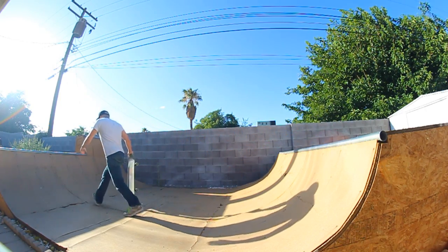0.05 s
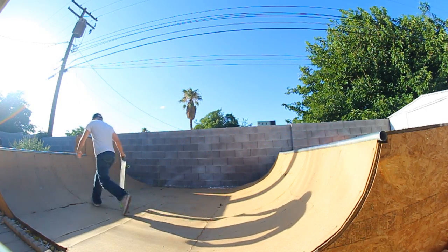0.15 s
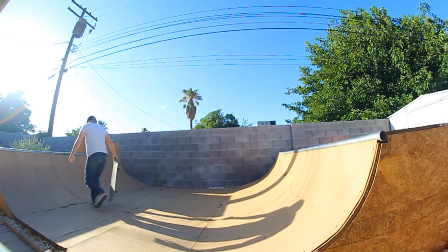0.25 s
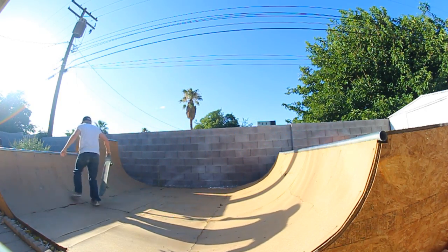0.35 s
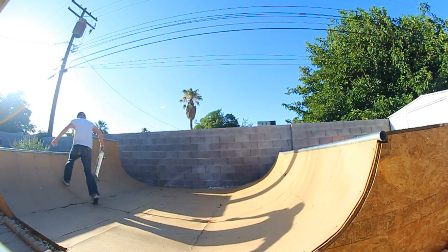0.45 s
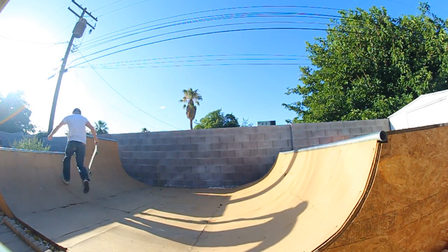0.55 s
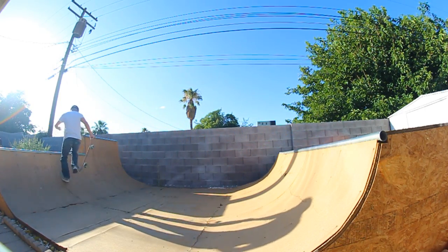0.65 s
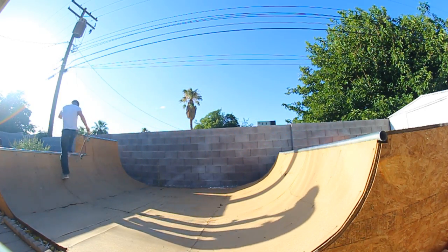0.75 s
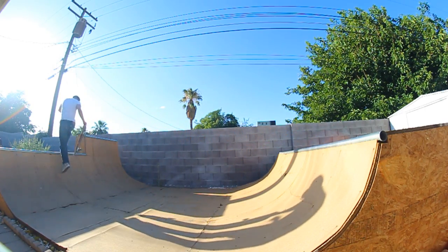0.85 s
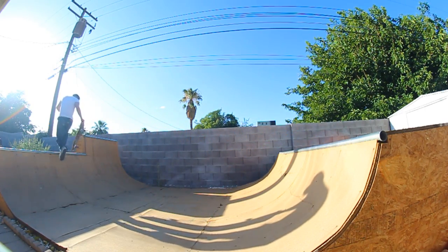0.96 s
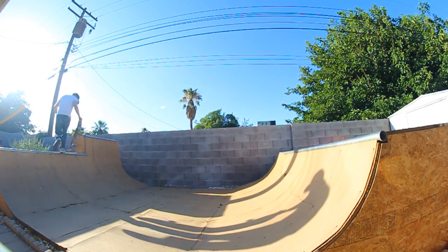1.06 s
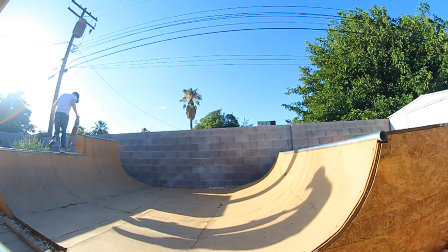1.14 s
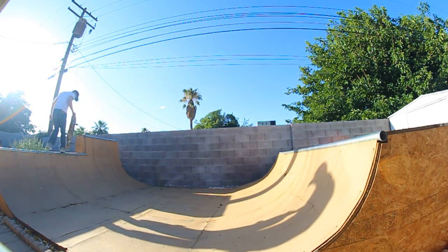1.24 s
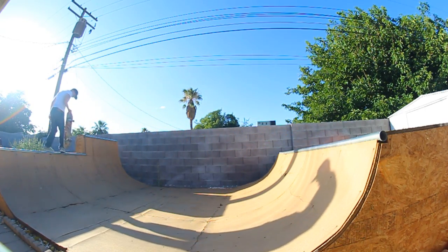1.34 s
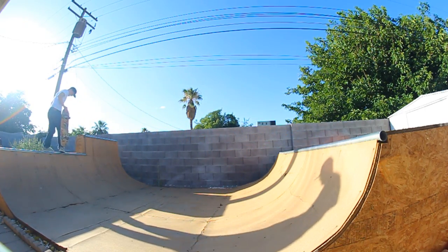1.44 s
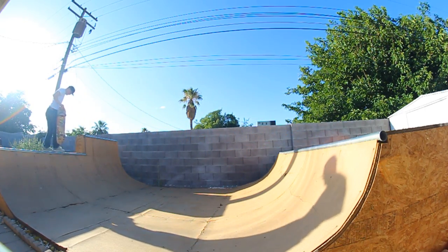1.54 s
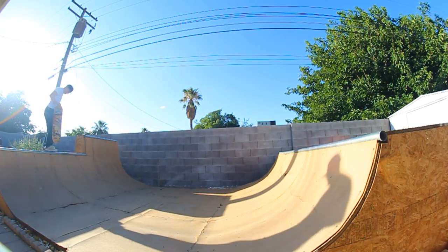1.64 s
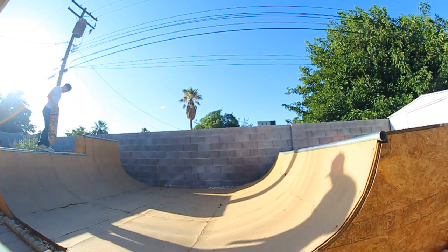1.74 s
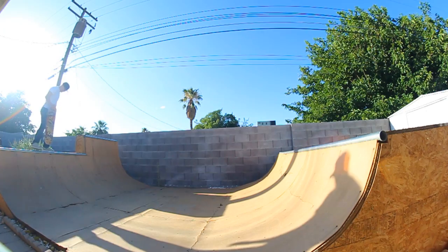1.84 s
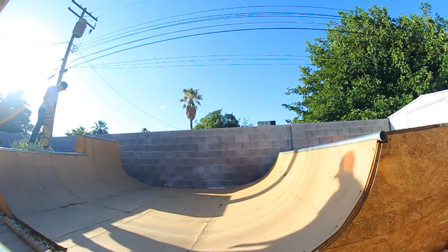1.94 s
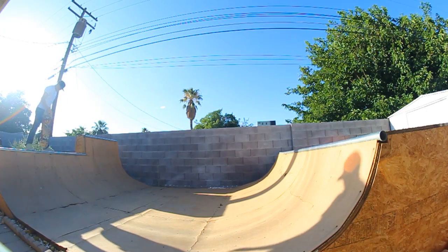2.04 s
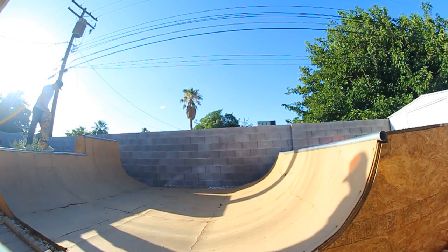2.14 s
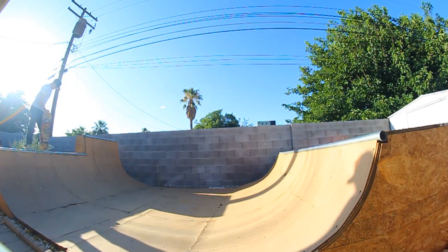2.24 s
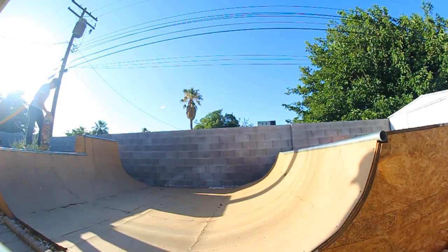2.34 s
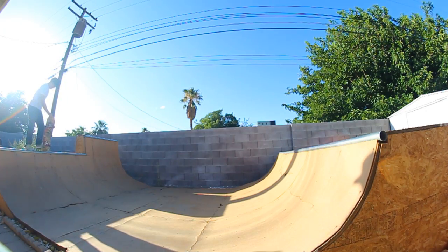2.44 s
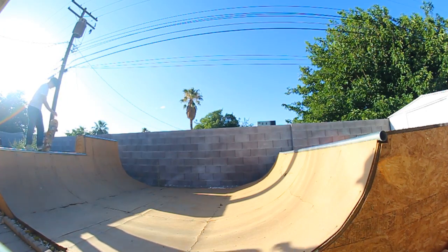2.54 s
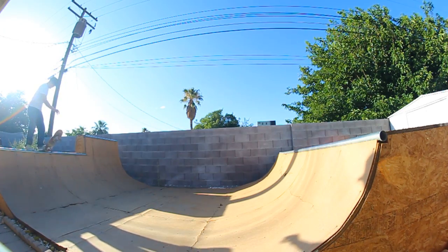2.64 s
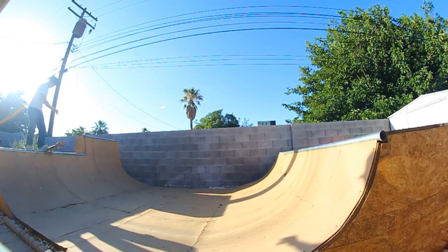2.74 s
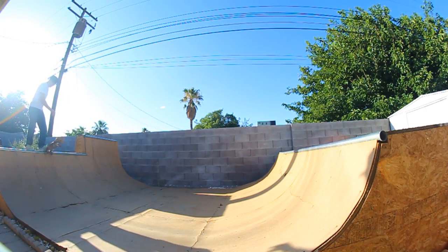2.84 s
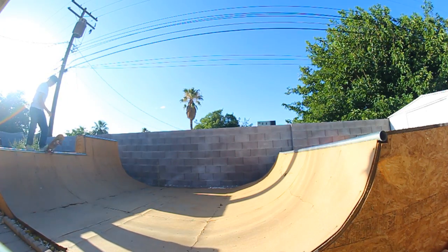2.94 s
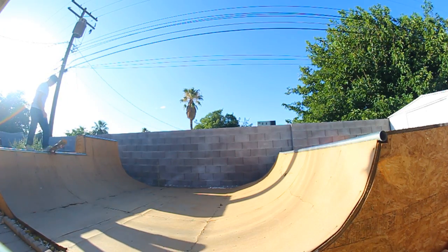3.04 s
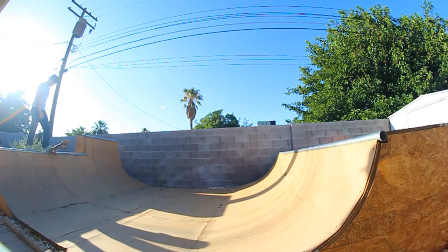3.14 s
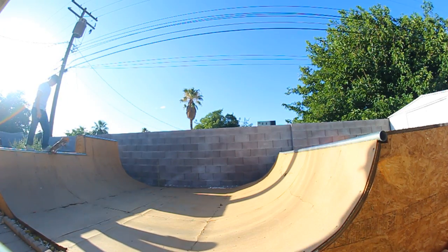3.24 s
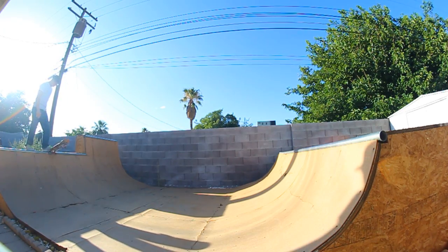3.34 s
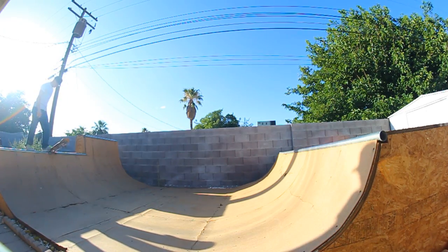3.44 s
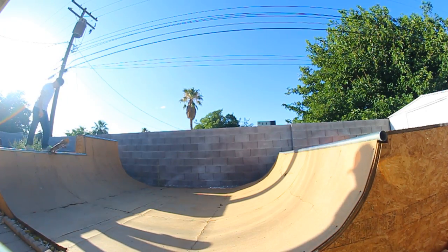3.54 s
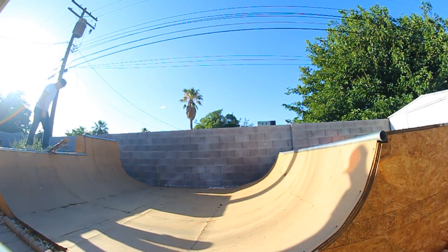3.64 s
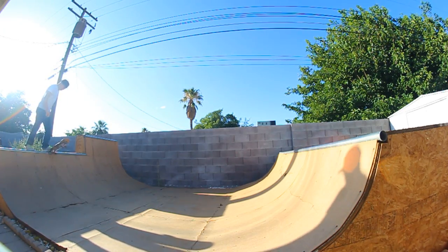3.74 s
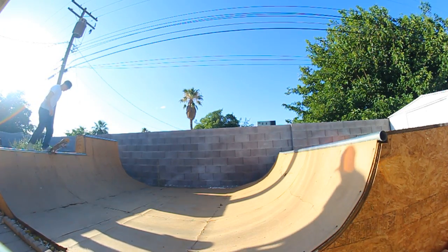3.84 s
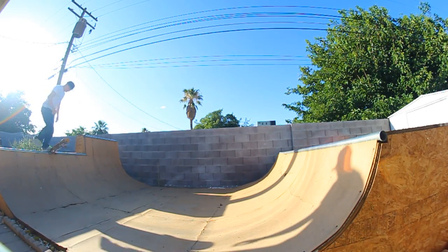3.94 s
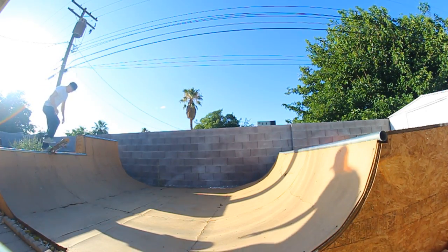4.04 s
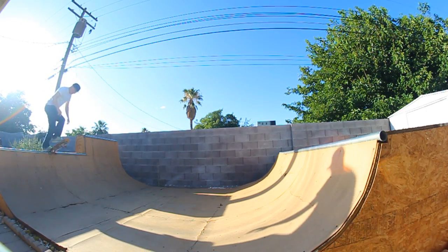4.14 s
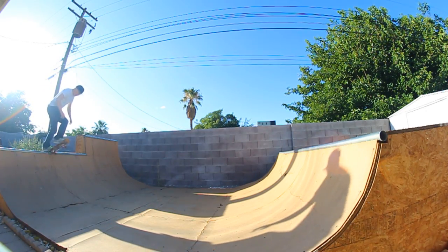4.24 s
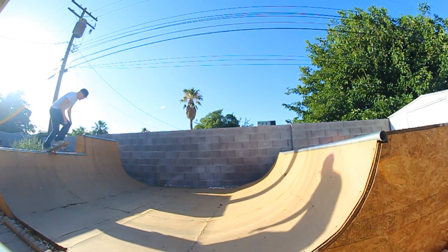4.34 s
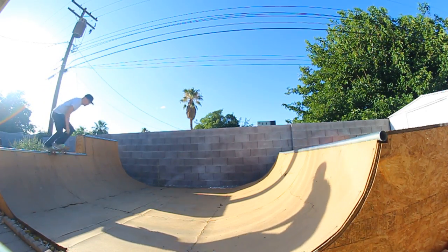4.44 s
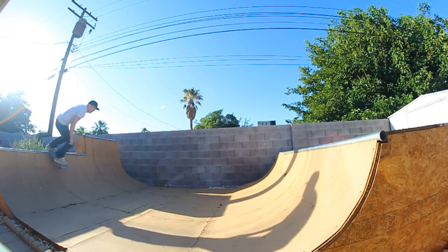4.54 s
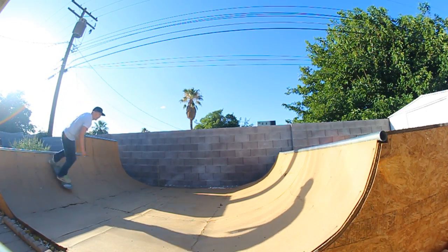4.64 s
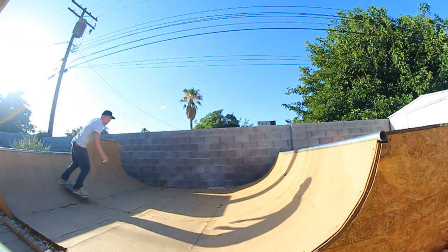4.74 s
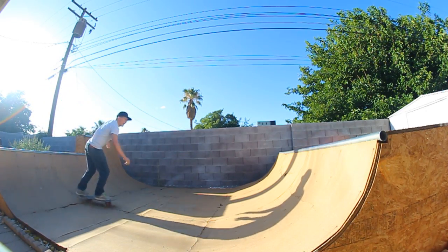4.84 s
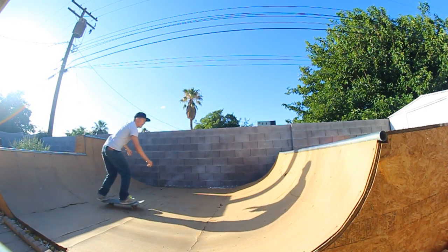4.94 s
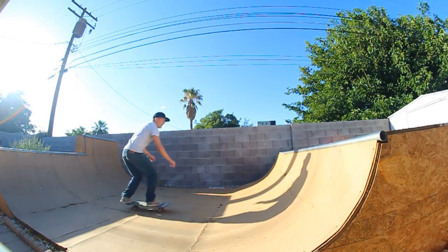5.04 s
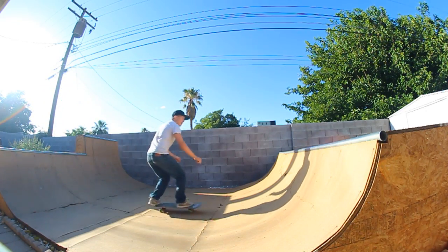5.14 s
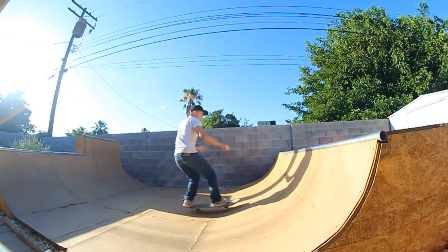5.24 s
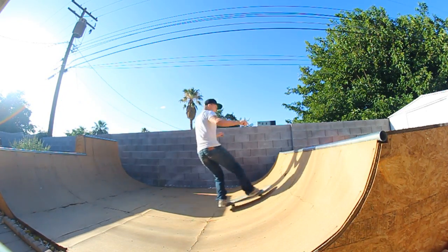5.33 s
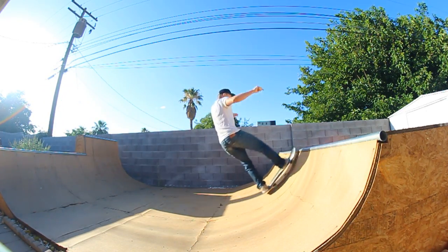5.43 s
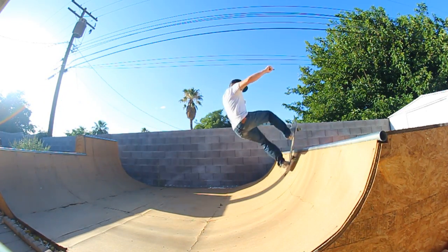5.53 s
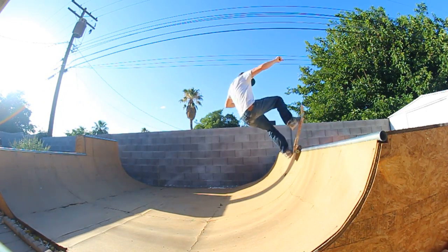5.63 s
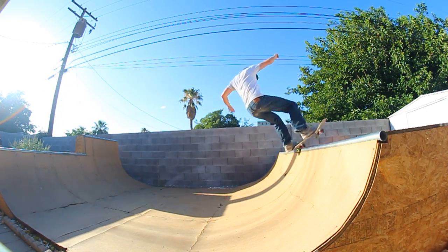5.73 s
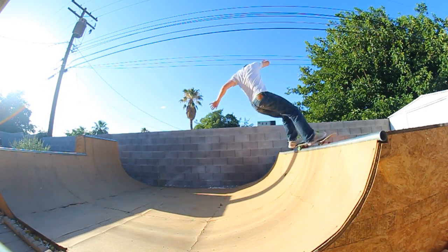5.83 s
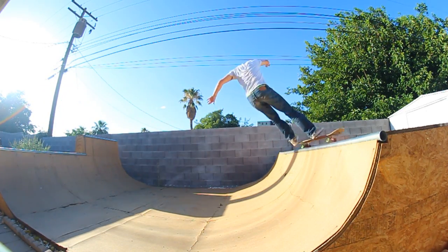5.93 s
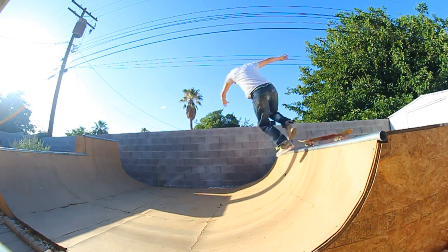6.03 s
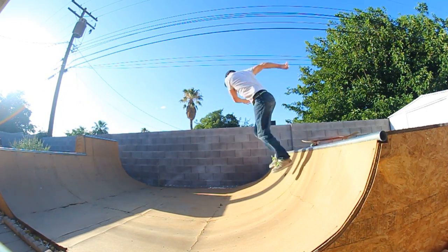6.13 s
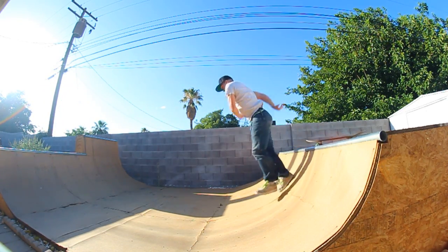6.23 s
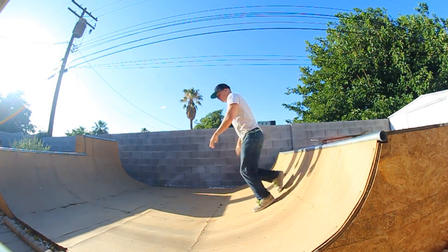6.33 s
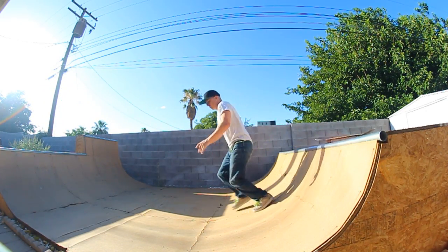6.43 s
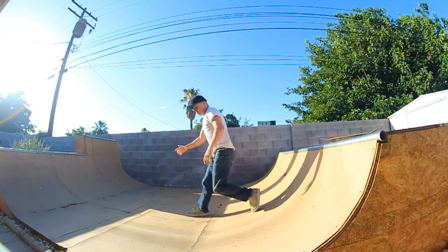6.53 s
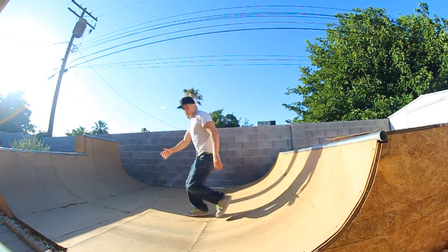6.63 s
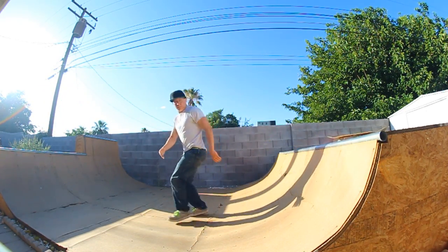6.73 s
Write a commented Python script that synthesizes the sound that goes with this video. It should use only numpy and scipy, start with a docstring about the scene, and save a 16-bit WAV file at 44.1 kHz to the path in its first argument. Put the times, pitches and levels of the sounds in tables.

```python
"""Outdoors on a hollow plywood ramp, near block walls, with a machine and traffic humming far off.
A skater walks up, sets the board on the steel edge, drops in, rolls over the sheet seams, hits the far
edge and runs out. Blows are noise bursts plus ringing modes; rolling and dragging are shaped noise;
rubber squeaks are gliding tones. The walls answer the blows and squeaks with a scattered tail.
A small microphone lifts near sounds around its port's resonance and clips on the loudest blows."""
import sys
import numpy as np
from scipy import signal
from scipy.fft import rfft, irfft, next_fast_len
from scipy.io import wavfile
from scipy.ndimage import map_coordinates

SR = 44100
rng = np.random.default_rng(int(sys.argv[2]) if len(sys.argv) > 2 else 0)


def waveform_to_disk(signal):
    """Save audio, clipped to [-1, 1], as 16-bit WAV at the path in sys.argv[1]."""
    frames = np.transpose(np.atleast_2d(signal))
    scaled = np.clip(frames, -1, 1) * 32767
    samples = np.round(scaled).astype(np.int16)
    wavfile.write(sys.argv[1], SR, samples)


N = 298998

# Table levels are relative: each source sets its own gain on top.
# Far traffic and hiss, spectral density [f/Hz, level/dB]
AIR_SPECTRUM = [(24, -35), (40, -2.5), (106, 0), (185, -6), (237, -5.5), (329, -8), (1210, -19),
                (1340, -20.5), (2000, -26), (2910, -30), (14800, -33.5), (16000, -32)]
# Far machine, steady tones [f/Hz, level/dB]
HUM_TONES = [(236.9, -54), (532.9, -65), (1120, -77), (1357, -68), (1475, -75), (2299, -74), (2945, -74.5)]
# Wind on the microphone [t/s, level/dB, length/s]
WIND_PUFFS = [(1.257, -37, .07), (1.62, -45, .14), (1.74, -39, 0.089), (1.965, -40, .12), (2.15, -47, 0.28),
              (3.098, -40, 0.8), (6.0, -36, 0.31)]
# Thuds and wind, spectral density [f/Hz, level/dB]
DEEP_SPECTRUM = [(10, 9.5), (25, -19), (42, 17), (70, 3.5), (200, -62)]
# Decay of the block walls' answer [f/Hz, T60/s]
YARD_DECAY = [(150, 0.83), (1000, 0.38), (4000, 0.39), (10000, 0.21)]

# Modes of the hollow ramp (boom), plywood and board (knock), maple board [f/Hz, level/dB, T60/s]
PANEL_MODES = [(61, -22, 0.96), (76.5, 0.5, 0.29), (113.3, 0.5, 0.25), (151.5, -4, 0.14),
               (176.1, -0.5, 0.13), (211.2, -6, 0.063)]
SHEET_MODES = [(263.2, 0, 0.062), (330.7, 2, 0.04), (422, 1.5, 0.039), (520, 0, 0.021), (646, -0.5, 0.037),
               (748, -5.5, 0.027)]
DECK_MODES = [(886, -1.5, 0.063), (1224, 7.5, 0.036), (1430, 0, 0.014), (1960, -2.5, 0.11),
              (2230, -8, 0.079)]
# Noise of hard parts in low, middle and high treble, and of grit: spectral density [f/Hz, level/dB]
CLACK_SPECTRUM = [(400, -2.5), (800, 3.5), (1300, -1), (2000, -5.5), (3000, -28.5), (6000, -41)]
BITE_SPECTRUM = [(1500, -7), (2500, 0), (4500, -11.5), (6000, -18), (10000, -37)]
TOP_SPECTRUM = [(3500, 0), (6000, 0.5), (9000, -5.5), (16000, -16)]
GRIT_SPECTRUM = [(1500, 0.5), (2500, 4), (4500, -4.5), (6000, -9), (10000, -14.5), (16000, -22)]

# Wheels on the ramp [t/s, boom level/dB, drumming level/dB, clatter level/dB, grit level/dB]
WHEEL_LEVELS = [(4.752, -11, -3.5, -50, -54), (4.796, -6.5, -7, -48, -52), (4.838, -20, -15.5, -23, -38),
                (4.896, -12, -17, -30.5, -36.5), (4.99, -1, -15.5, -32, -36),
                (5.044, -19, -20.5, -31, -37.5), (5.07, -5, -27, -32, -36.5),
                (5.226, -33, -16.5, -46, -44.5), (5.36, -12.5, -21.5, -26, -35),
                (5.45, -15, -13, -30, -33.5), (5.626, -0.5, -2.5, -21, -28), (5.67, -17, -18.5, -19.5, -39),
                (5.77, -15.5, -17, -24.5, -41), (5.9, -44, -42, -39, -46)]
# Clatter of feet and board, and a faint hiss throughout [t/s, clatter level/dB, hiss level/dB]
CLATTER_AND_HISS_LEVELS = [(0.0, -56, -54.5), (0.6, -61, -54), (1.07, -56.5, -56), (1.4, -59.5, -57.5),
                           (2.5, -60.5, -59), (2.75, -49, -54), (2.86, -30, -44), (3.0, -49, -52.5),
                           (3.13, -38.5, -45.5), (3.33, -47.5, -61.5), (3.65, -64, -58), (4.3, -63, -62),
                           (4.7, -49, -51), (5.9, -40, -39), (5.95, -21.5, -40.5), (6.12, -45.5, -48.5),
                           (6.3, -32.5, -42), (6.42, -26.5, -53), (6.52, -33.5, -42), (6.64, -61, -52),
                           (6.78, -61, -57)]
# Soles and board dragging on the sheet or the edge [start t/s, middle of the fade-out t/s, level/dB,
# centre f/Hz, width/octaves]
DRAGS = [(0.22, 0.292, -59, 4550, 0.86), (1.468, 1.567, -45, 470, 0.99), (3.17, 3.33, -42.5, 460, 1.5),
         (3.103, 3.1, -44, 3600, 0.25), (3.166, 3.305, -55.5, 3000, 1.45), (5.359, 5.3, -34, 3900, 1.9),
         (5.42, 5.4, -36.5, 4500, .9), (2.781, 2.93, -46, 1790, 2), (2.875, 2.98, -45.5, 2000, 0.55),
         (5.926, 6.046, -48, 5060, 1.4), (5.76, 5.824, -32, 3400, 1.03), (5.805, 5.8, -34, 2700, 0.44),
         (6.384, 6.435, -37, 3460, 0.32), (6.463, 6.527, -42, 3600, 0.51), (6.655, 6.673, -31, 4900, 0.86)]
# Rubber soles slipping on the sheet [t/s, f/Hz, level/dB, length/s, octave level/dB over the tone]
SOLE_SQUEAKS = [(0.633, 1810, -25, 0.0051, -20), (0.645, 1950, -17.5, 0.0049, -20),
                (0.666, 2080, -39, 0.032, -10), (0.692, 1990, -39.5, 0.022, -19),
                (0.737, 2010, -63, 0.061, -16), (1.092, 4440, -52, 0.013, -30),
                (1.11, 4400, -56, .012, -30), (1.13, 4400, -60, .012, -30), (6.67, 2186, -14, 0.0072, -5),
                (6.735, 2230, -41, 0.026, -19), (6.762, 2300, -54, 0.024, -22)]

# Footfalls, board striking the ramp or its steel edge, axles crossing a seam between sheets
# [t/s, crack level/dB in low, middle and high treble, knock level/dB, boom level/dB,
# rattle level/dB over the crack]
FOOTFALLS = [(0.2108, -62, -65, -64, -33, -25.5, -1), (0.622, -34, -44, -58, -31, -24, 0),
             (0.6335, -37.5, -42, -47.5, -21.5, -31, 1), (1.032, -50, -64, -68, -27, -23, 5),
             (1.085, -58, -68, -70, -30, -23, 8), (1.466, -54, -72, -72, -25.5, -29, 8),
             (2.1496, -72, -71, -72, -35.5, -31, -5), (2.5454, -42.5, -64, -70, -24.5, -19.5, -0.5),
             (2.6124, -49, -56, -66, -28, -25, 0), (3.19, -44, -48, -66, -23.5, -20, 5),
             (3.605, -51, -58, -55, -43, -41, 2), (3.674, -52.5, -63, -70, -37, -36, 5.5),
             (4.376, -56, -67, -77, -36, -48, 9.5), (4.4089, -47, -57, -60, -35, -23.5, 1.5),
             (4.5954, -56, -70, -55.5, -39, -33.5, 2), (6.0855, -27, -48, -46, -7, -16, -0.5),
             (6.2291, -14, -47, -37, -2.5, -0.5, 0), (6.2359, -20, -39, -47, 1, -17, 0.5),
             (6.4395, -9.5, -11.5, -25.5, 1, 4.5, -20), (6.6502, -33, -40, -40, -18.5, -21, 2.5),
             (6.6769, -15.5, -16.5, -28, -3.5, 6, -16)]
BOARD_STRIKES = [(0.58, -69, -47, -47, -52, -55, -10), (2.7122, -48, -55, -56, -36, -39, 3),
                 (2.778, -21, -36.5, -48, -11.5, -24, 1), (2.7868, -33, -40, -41, -7, -10, -3),
                 (2.8673, -15, -21, -49, -9, -11.5, -6.5), (2.985, -50, -58, -66, -36, -28.5, 0),
                 (3.0639, -58, -50, -63, -46, -36, -11), (3.1508, -26.5, -28, -60, -41, -44, -12),
                 (3.1624, -43, -43, -48, -26, -22, 2), (4.6663, -53, -54, -67, -49, -35, -12),
                 (4.746, -3.5, -14, -29, -1, -0.5, -9.5), (4.7603, -21.5, -31, -40, 7, 1, 10),
                 (4.788, -14.5, -26.5, -49, -16, -2, 2), (5.552, -13, -21, -28.5, 2, 2, -14),
                 (5.6031, -14, -24.5, -28, 11, 4, 6), (5.6237, -23, -31, -47, -9, 2, 0),
                 (5.7031, -21, -34.5, -33, -2, -2.5, 1), (5.7661, -19, -29.5, -31, -11, -4.5, 6),
                 (5.917, -13, -30, -32.5, -1, -1.5, -2.5), (5.948, -22, -42, -44, 2, -3, -7),
                 (6.1657, -33.5, -57, -48, -24, -20, -5), (6.2024, -27.5, -41, -40, -4, -16, -6),
                 (6.348, -14.5, -21.5, -34, -8, -10, -26), (6.355, -27, -25, -46, 1, -22, -10),
                 (6.367, -8, -11.5, -16.5, 0, 0.5, -17), (6.383, -26, -32, -57, -1.5, -2.5, -19)]
SEAM_CROSSINGS = [(4.918, -29.5, -41, -50, -5, 2, 3), (4.9996, -28.5, -40, -45, -28, -1.5, 0),
                  (5.1056, -18.5, -24.5, -53, -1, -2.5, -1), (5.162, -16, -21, -54, 0, -12, -8),
                  (5.2016, -15, -21.5, -48, -0.5, -5.5, -4.5), (5.254, -16.5, -24.5, -41, 1.5, -0.5, -4),
                  (5.3681, -17, -20.5, -30, -1.5, 0.5, -25), (5.4409, -11, -19, -27, 7.5, -2, -16),
                  (5.4767, -32, -47, -56, 1.5, -2.5, 7)]
# The axle's second wheel meets the seam later and softer [delay/s], [level change/dB, column by column]
OTHER_WHEEL_S, OTHER_WHEEL_DB = 0.011, (-17, -7, -2, -7.5, -12.5, -8)
# What each kind favours [knock f/Hz, shudder level/dB over the blow, softness/times the attack]
STEP_KIND, STRIKE_KIND, SEAM_KIND = (300, -15.5, 1.57), (279, -14.5, 1.17), (435, -36, 1.19)
# Boom pitch favoured by the part of the ramp under the skater [t/s, f/Hz]
PLACE_PITCH = [(0.2, 83), (1.1, 84.5), (2.6, 120), (2.8, 140), (3.2, 79.5), (4.75, 118), (5.0, 75),
               (5.3, 180), (5.6, 116), (5.9, 84), (6.2, 173), (6.37, 91), (6.44, 200), (6.68, 150)]
# The ramp shuddering on: rows for boom, drumming and deep thud [level/dB, swell/s before softness, T60/s]
AFTER_SHUDDER = [(-1, 0.01, 0.41), (-5.5, 0.0084, 0.24), (-15, .03, 0.5)]

SHUDDER_GROWS = 0.77  # dB of shudder per dB of blow: hard blows ring more than they shudder
SOFT_DAMPS_DB_PER_S = 450  # a soft blow stays on and damps the boom, per unit of softness over 1
AIR_DB = -50
BAND_LIMIT_HZ = 16000


def amp(db):
    """Decibels to amplitude."""
    return 10 ** (np.asarray(db) / 20)


def unit(x):
    """Scale to rms 1."""
    return x / np.sqrt(np.mean(x ** 2) + 1e-20)


def along(points, hz):
    """Values at hz from (frequency, value) points on a log axis."""
    f, v = np.transpose(points)
    return np.interp(np.log(hz + 1), np.log(f + 1), v)


def curves(rows):
    """One gain per sample for each level column, fading to silence just outside the table."""
    s, *columns = np.transpose(rows)
    s = np.r_[s[0] - 0.004, s, s[-1] + 0.02]
    t = np.arange(N) / SR
    return [amp(np.interp(t, s, np.r_[-100, column, -100])) for column in columns]


def wobble(rate):
    """A smooth random curve, rate knots a second."""
    knots = rng.standard_normal(int(N * rate / SR) + 4)
    return map_coordinates(knots, [np.arange(N) * rate / SR])


def filtered(x, response):
    """x times a complex response of frequency."""
    m = next_fast_len(N + SR // 2)
    return irfft(rfft(x, m) * response(np.fft.rfftfreq(m, 1 / SR)), m)[:N]


def noise(spectrum):
    """Coloured noise of rms 1."""
    return unit(filtered(rng.standard_normal(N), lambda hz: amp(along(spectrum, hz))))


def resonant(modes, low_hz, top_hz):
    """Noise of rms 1 through a body's modes; little is driven outside low_hz to top_hz."""
    def body(f):
        peaks = 0
        for k, (centre, db, t60) in enumerate(modes):
            damping = 1j * f * 2.2 / t60  # a short decay makes a wide peak
            peaks = peaks + (-1) ** k * amp(db) * damping / (centre ** 2 - f * f + damping)
        drive = (1j * f / (low_hz + 1j * f) / (1 + 1j * f / top_hz)) ** 2
        return peaks * drive
    return unit(filtered(rng.standard_normal(N), body))


def ring(modes, t, spot_hz, attack, spread, focus_db):
    """One blow on a body, peak 1: modes lose focus_db per octave from spot_hz and vary at random."""
    hz, db, t60 = np.transpose(modes)[:, :, None]
    level_draw, pitch_draw, phase_draw = rng.standard_normal((3, len(modes), 1))
    level = db - focus_db * np.abs(np.log2(hz / spot_hz)) + 2.4 * level_draw
    phase = 2 * np.pi * (hz * (1 + spread * pitch_draw) * t + 0.08 * phase_draw)
    x = np.sum(amp(level - 60 * t / t60) * np.sin(phase), axis=0)
    x = x * (1 - np.exp(-t / attack))
    return x / np.max(np.abs(x))


def background():
    """Far off: traffic and hiss as swelling noise, a machine as wavering tones; wind as deep noise puffs."""
    t = np.arange(N) / SR
    air = amp(AIR_DB) * amp(0.9 * wobble(4.3)) * noise(AIR_SPECTRUM)
    hum = np.zeros(N)
    for hz, db in HUM_TONES:
        level = amp(db + 3.5 + 1.8 * wobble(9))
        hum += level * np.sin(2 * np.pi * (hz * t + 0.016 * wobble(3.2)))
    gusts = sum(amp(db) * np.exp(-(2 * (t - s) / length) ** 2) for s, db, length in WIND_PUFFS)
    return air + hum + amp(-3.5) * gusts * noise(DEEP_SPECTRUM)


def yard(x):
    """The walls' answer: each frequency dies at its own speed; new scatter every third of a second."""
    out, step = np.zeros(N + SR), SR // 3
    delay = 400  # samples, about 9 ms
    for start in range(0, N, step):
        hz, t, z = signal.stft(rng.standard_normal(SR // 2), SR, nperseg=256)
        decay = amp(-60 * t / along(YARD_DECAY, hz)[:, None])
        tail = signal.istft(z * decay, SR, nperseg=256)[1]
        wet = signal.fftconvolve(x[start:start + step], tail / np.linalg.norm(tail))
        out[start + delay:][:len(wet)] += wet
    return out[:N]


def scrapes():
    """Dragging: grainy noise around a centre pitch, with soft ends."""
    out, t = np.zeros(N + SR), np.arange(SR // 4) / SR
    f = np.fft.rfftfreq(len(t), 1 / SR)
    grain = amp(2.5 * wobble(500) + 1.5 * wobble(60))
    for start, end, db, hz, octaves in DRAGS:
        fade_in, fade_out = t / 0.011, (end - start - t) / 0.04 + 0.5
        stroke = np.clip(np.minimum(fade_in, fade_out), 0, 1)
        band = 1 / (1 + (np.log2((f + 1) / hz) / octaves) ** 4)
        hiss = irfft(rfft(rng.standard_normal(len(t))) * band, len(t))
        out[round(start * SR):][:len(t)] += amp(db) * stroke * unit(hiss)
    return out[:N] * unit(grain)


def squeaks():
    """Stick-slip of rubber: a short, unsteady tone with its octave, sagging as the sole slows."""
    t, out = np.arange(N) / SR, np.zeros(N)
    waver = np.cumsum(0.04 * wobble(700)) / SR  # summed pitch deviation
    grip = amp(5 * wobble(500))
    for s, hz, db, length, octave_db in SOLE_SQUEAKS:
        at = slice(round((s - 2 * length) * SR), round((s + 2 * length) * SR))
        u = t[at] - s
        phase = 2 * np.pi * hz * (u - 0.023 * u ** 2 / length + waver[at])
        tone = np.sin(phase) + amp(octave_db) * np.sin(2 * phase)
        out[at] += amp(db) * np.exp(-(2 * u / length) ** 2) * tone
    return unit(grip) * out


def all_blows():
    """Every blow as one row, followed by what its kind and its place favour."""
    late = np.add(SEAM_CROSSINGS, [OTHER_WHEEL_S, *OTHER_WHEEL_DB])
    kinds = ((FOOTFALLS, STEP_KIND), (BOARD_STRIKES, STRIKE_KIND),
             (SEAM_CROSSINGS, SEAM_KIND), (late, SEAM_KIND))
    place_s, place_hz = np.transpose(PLACE_PITCH)
    return np.array([[*row, *kind, np.interp(row[0], place_s, place_hz)]
                     for rows, kind in kinds for row in rows])


def shudder():
    """Gains of boom, drumming and thud: each swells after a blow, slower if soft, and dies; powers add."""
    s, _, _, _, knock_db, boom_db, _, _, after_db, soft, _ = all_blows().T
    sample = np.round(s * SR).astype(int)
    t, power = np.arange(SR) / SR, np.zeros((3, N))
    strengths = boom_db, knock_db, boom_db
    for layer, (strength_db, (db, swell, t60)) in enumerate(zip(strengths, AFTER_SHUDDER)):
        blow_power = amp(SHUDDER_GROWS * strength_db + after_db + db) ** 2
        for softness in np.unique(soft):
            blows_at = np.bincount(sample, (soft == softness) * blow_power, N)
            shape = (1 - np.exp(-t / (swell * softness))) * amp(-60 * t / t60)
            power[layer] += signal.fftconvolve(blows_at, (shape / shape.max()) ** 2)[:N]
    return np.sqrt(np.abs(power))


def ramp():
    """Wheels and after-shudder shake panels and sheet; trucks clatter, grit hisses under the wheels."""
    boom, drumming, clatter, grit = curves(WHEEL_LEVELS)
    boom_after, drumming_after, thud = shudder()
    clatter_about, hiss_level = curves(CLATTER_AND_HISS_LEVELS)
    bumps = unit(amp(3.2 * wobble(30)))
    rustle = unit(amp(2.2 * wobble(45)))
    panels = resonant(PANEL_MODES, low_hz=46.7, top_hz=285)
    sheet = resonant(SHEET_MODES, low_hz=187, top_hz=420)
    low = np.hypot(boom, boom_after) * amp(2.5 * wobble(14)) * panels
    low = low + np.hypot(drumming, drumming_after) * bumps * sheet
    low = low + thud * noise(DEEP_SPECTRUM)
    wheel_grit = unit(amp(2.5 * wobble(40) + 2.1 * wobble(250)) * noise(GRIT_SPECTRUM))
    background_grit = unit(amp(1.3 * wobble(250)) * noise(GRIT_SPECTRUM))  # the faint hiss throughout
    high = np.hypot(clatter * bumps, clatter_about * rustle) * noise(CLACK_SPECTRUM)
    high = high + grit * wheel_grit + hiss_level * background_grit
    return amp(-3) * (low + high)


def blows():
    """Each blow: sharp crack, noisy rattle of hard parts, knock of board and plywood, boom of the ramp."""
    t = np.arange(SR // 5) / SR
    hard, wood = np.zeros((3, N + SR)), np.zeros(N + SR)
    crack = 1.5 * np.exp(-(t / 0.003) ** 2) * (1 - np.exp(-t / 0.0003))
    rattle_t60 = np.array([[0.1], [0.085], [0.06]])  # s; the highest treble dies first
    rattle = 1.67 * amp(-60 * t / rattle_t60) * (1 - np.exp(-t / 0.0048))
    for row in all_blows():
        s, low_db, middle_db, high_db, knock_db, boom_db, rattle_db, knock_hz, _, soft, boom_hz = row
        at = slice(round(s * SR), round(s * SR) + len(t))
        hard[:, at] += amp([[low_db], [middle_db], [high_db]]) * (crack + amp(rattle_db) * rattle)
        deck = ring(DECK_MODES, t, 2400, attack=0.0025, spread=0.089, focus_db=-1.0)
        knock = ring(SHEET_MODES, t, knock_hz, attack=0.0023 * soft, spread=0.037, focus_db=10.0)
        boom = ring(PANEL_MODES, t, boom_hz, attack=0.0048 * soft, spread=0.03, focus_db=15)
        soft_damping_db = SOFT_DAMPS_DB_PER_S * (soft - 1) * t
        wood[at] += amp(low_db - 4.0) * deck
        wood[at] += amp(knock_db - 6.0) * knock
        wood[at] += amp(boom_db - 4.0 - soft_damping_db) * boom
    chatter = amp(0.51 * wobble(400))  # loose parts touch many times
    bands = [noise(CLACK_SPECTRUM), noise(BITE_SPECTRUM), noise(TOP_SPECTRUM)]
    return chatter * np.sum(hard[:, :N] * bands, axis=0) + wood[:N]


def microphone_port(near):
    """The port lifts near sounds around its resonance and drops their deepest bass."""
    def response(f):
        damping = 1j * f * 700  # resonance 700 Hz wide
        lift = 1 + amp(1.0) * damping / (3750 ** 2 - f * f + damping)
        bass_cut = (1j * f / (35 + 1j * f)) ** 2
        return lift * bass_cut
    return filtered(near, response)


def scene():
    """Near sounds through the microphone port, over the background, which bypasses it."""
    sharp = blows() + squeaks()
    near = sharp + amp(-13.5) * yard(sharp) + scrapes() + ramp()
    return (microphone_port(near) + background())[None]


def record(dry):
    """The input clips just under full scale; nothing is kept above the band limit."""
    clipped = dry[0] / (1 + np.abs(dry[0] / 0.99) ** 30) ** (1 / 30)
    return filtered(clipped, lambda hz: hz < BAND_LIMIT_HZ)[None]


dry = scene()
out = record(dry)
waveform_to_disk(out)
```